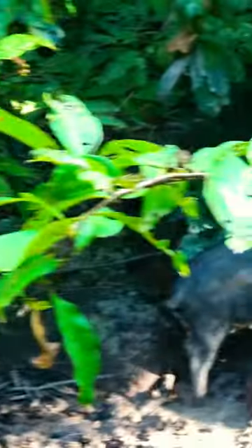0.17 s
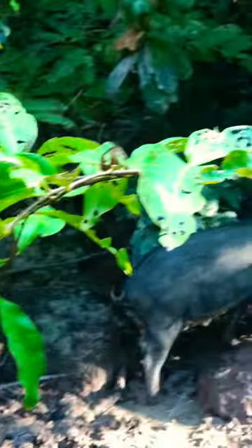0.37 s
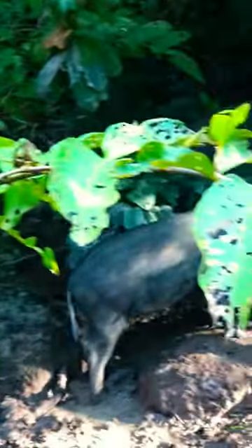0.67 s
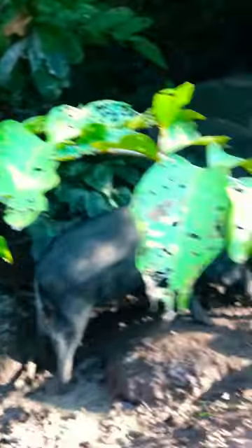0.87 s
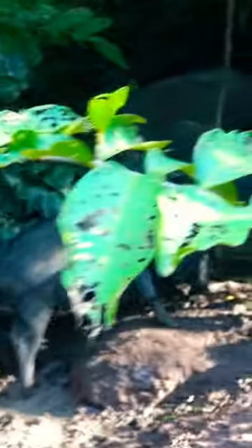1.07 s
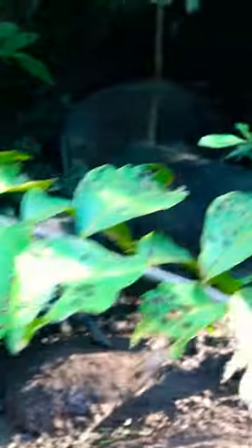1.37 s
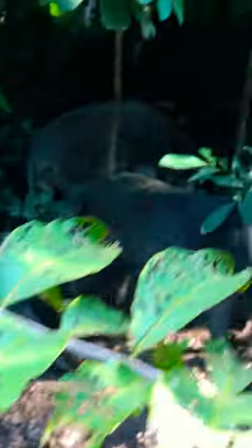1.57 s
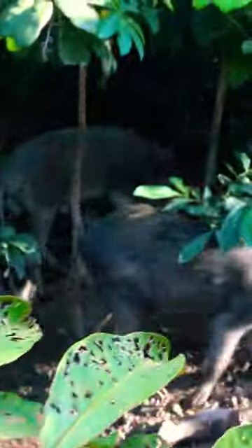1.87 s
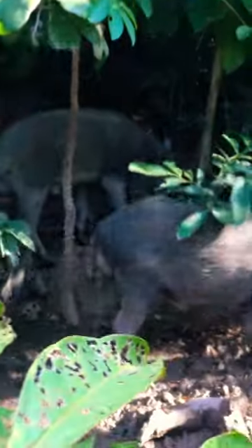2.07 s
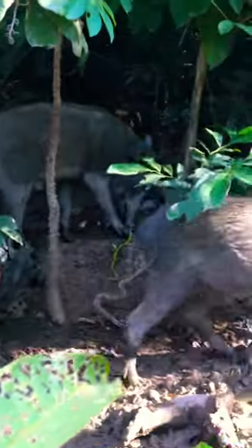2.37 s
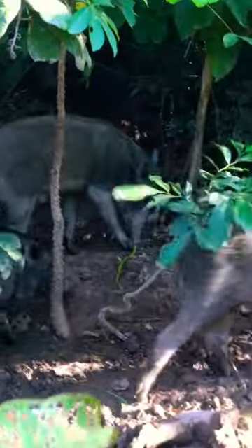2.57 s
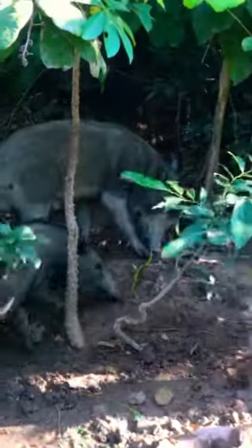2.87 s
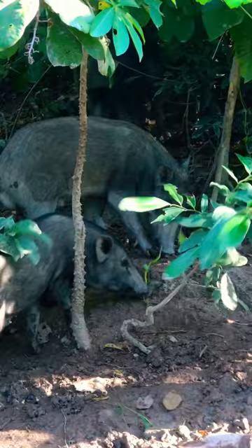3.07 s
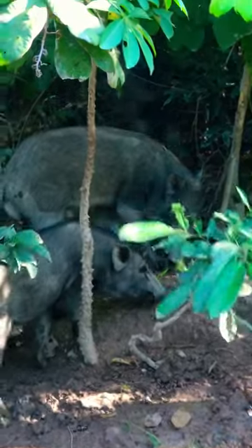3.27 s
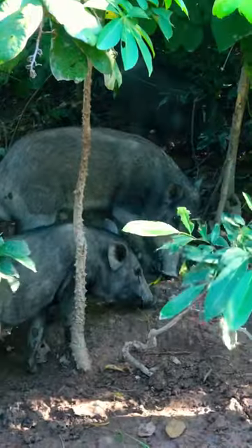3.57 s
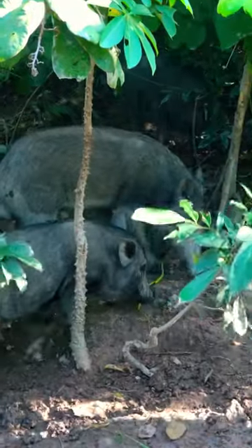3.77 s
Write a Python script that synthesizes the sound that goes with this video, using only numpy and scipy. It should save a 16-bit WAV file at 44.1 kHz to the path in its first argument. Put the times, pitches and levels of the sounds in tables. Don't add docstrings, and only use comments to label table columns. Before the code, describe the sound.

Rustling, crackling litter as boars forage, with snapping twigs over a faint low engine drone

```python
import sys
import numpy as np
from scipy import signal
from scipy.io import wavfile

SR = 44100
rng = np.random.default_rng(int(sys.argv[2]) if len(sys.argv) > 2 else 0)


def boost_factor(decibels):
    exponent = np.asarray(decibels, float) / 20
    return 10 ** exponent


def persist_wave(psi):
    counts = np.round(np.clip(psi, -1, 1) * 32767).astype(np.int16)
    wavfile.write(sys.argv[1], SR, np.atleast_2d(counts).T)


N = 173313


def in_time(rows):
    s, *columns = np.transpose(rows)
    return [np.interp(np.arange(N) / SR, s, c) for c in columns]


def rms_one(x):
    return x / np.sqrt(np.mean(x ** 2) + 1e-20)


def drift(rate_hz):
    pole = np.exp(-80 * np.pi * rate_hz / SR)
    noise = rng.standard_normal(N // 40 + 2002)
    slow = signal.lfilter([1], [1, -2 * pole, pole * pole], noise)[2000:]
    return np.interp(np.arange(N) / 40, np.arange(len(slow)), rms_one(slow - slow.mean()))


def band_pass(low_hz, high_hz, x):
    return signal.sosfilt(signal.butter(2, [low_hz, high_hz], "band", fs=SR, output="sos"), x)


def grains(spectrum, per_s, spread_db, hiss, patchy_db, clump_db):
    points_hz, points_db = np.transpose(spectrum)
    octaves = np.log2(points_hz[-1] / points_hz[0])
    edges_hz = points_hz[0] * 2 ** np.arange(0, octaves + .3, 1 / 3)
    clump = drift(16) + .6 * drift(50)
    sizes = boost_factor(spread_db * np.minimum(rng.exponential(1, N), 3.2)) * rng.choice([-1, 1], N)
    clicks = rms_one(sizes * (rng.random(N) < per_s * boost_factor(clump_db * clump) / SR))
    place = rng.uniform(0, len(edges_hz), N)
    white = rng.standard_normal((2, N))
    out = 0
    for k, (low, high) in enumerate(zip(edges_hz, np.minimum(edges_hz[1:], 19000))):
        reach = np.exp(-.5 * ((place - k) / 2.25) ** 2)
        band = band_pass(low, high, rms_one(clicks * reach) + hiss * white[k % 2])
        db = np.interp(np.log(low * high) / 2, np.log(points_hz), points_db)
        out = out + band * boost_factor(db + patchy_db * (drift(16.6) + 0.45 * clump))
    return rms_one(out)


def blows(rows, cycles, crack_db):
    size, crunch_t60_s, contact_cycles = 8000, .07, 1
    out, t = np.zeros(N + size), np.arange(size) / SR
    for s, db, hz, crunch_db in rows:
        draw, noise = rng.uniform(0, 1, 2), rng.standard_normal(size)
        crack = signal.lfilter(*signal.butter(1, min(hz * 4.3, 15000), fs=SR), noise)
        hit = boost_factor(crack_db) * crack * np.exp(-t / 0.0018)
        modes = [(1, 1), (0.784 + 0.044 * draw[0], .5), (1.053 + 0.48 * draw[1], .4)]
        for ratio, share in modes:
            ring = np.sin(2 * np.pi * min(hz * ratio, 15000) * t)
            hit = hit + share * ring * boost_factor(-60 * t * hz / cycles)
        rough = noise * np.minimum(noise[::-1] ** 2, 4.)
        crunch = rms_one(band_pass(hz * 0.56, min(hz * 1.94, 15500), rough))
        hit = .8 * hit + boost_factor(crunch_db - 5 - 60 * t / crunch_t60_s) * crunch
        onset = 1 - np.exp(-(t * hz / contact_cycles) ** 2)
        start = int(s * SR)
        out[start:start + size] += boost_factor(db) * hit * onset
    return out[:N]


def rooting():
    # start_s, level_db
    effort = [
        (0.0, -67.5),
        (0.43, -66),
        (1.2, -63),
        (1.64, -57),
        (2.52, -60),
        (2.8, -58),
        (2.93, -64),
        (3.44, -63.5),
        (3.6, -68.5),
        (3.93, -64.5),
    ]
    # freq_hz, level_db per Hz
    soil_spectrum = [(600, -11), (1300, 0.5), (2500, -0.5), (4000, -1), (7000, -4.5), (16000, -23)]
    # freq_hz, level_db per Hz
    tread_spectrum = [(90, -3.5), (250, -4), (600, -7), (2000, -26)]
    soil_db, = in_time(effort)
    soil = grains(soil_spectrum, per_s=900, spread_db=4.0, hiss=0.95, patchy_db=2.3, clump_db=2.5)
    tread = grains(tread_spectrum, per_s=150, spread_db=0.0, hiss=0.59, patchy_db=2.0, clump_db=5.5)
    return boost_factor(soil_db + 0.24) * soil + boost_factor(.5 * soil_db - 34.5) * tread


def brushing():
    # start_s, level_db
    effort = [(0.0, -58), (0.16, -59), (0.48, -62), (1.05, -60), (1.29, -58.5), (1.61, -61.5),
              (2.44, -54.5), (2.76, -56.5), (2.92, -58.5), (3.28, -62), (3.79, -63), (3.93, -63.5)]
    # freq_hz, level_db per Hz
    leaf_spectrum = [(700, -7), (3000, 0.5), (6000, 1.5), (9000, 4), (13000, 1.5), (17000, -4.5)]
    brush_db, = in_time(effort)
    leaves = grains(leaf_spectrum, per_s=2200, spread_db=1.0, hiss=1.2, patchy_db=1.57, clump_db=4.0)
    return boost_factor(brush_db + 1.0) * leaves


def snaps():
    # start_s, peak_db, pitch_hz, crunch_db (re the snap)
    events = [(0.318, -55, 1720, -1), (0.488, -37, 2300, -11), (0.509, -32, 6700, -32),
              (0.709, -46, 4580, -4), (0.76, -41.5, 2100, -9), (0.965, -50.5, 1520, -0.5),
              (1.028, -48.5, 1140, -2), (1.117, -40.5, 1614, -6), (1.169, -37, 3170, -6),
              (1.391, -41, 3770, -6), (1.428, -37.5, 3000, -10.5), (1.514, -41, 2800, -3),
              (1.651, -46, 1850, -28), (1.772, -27.5, 3720, -33), (1.983, -37.5, 6060, -7),
              (2.045, -38, 2967, -18), (2.219, -40.5, 1206, -2.5), (2.33, -31.5, 2260, -16),
              (2.383, -33, 1180, -31), (2.505, -37.5, 3930, -21), (2.661, -30, 2090, -16),
              (2.883, -34.5, 2640, -15), (2.99, -43, 2160, -20), (3.051, -42, 4205, -16),
              (3.078, -51, 3960, -27), (3.16, -51, 1310, 2.5), (3.21, -63, 2860, -15),
              (3.288, -45.5, 2747, -20), (3.326, -45, 1349, -18), (3.443, -63, 3330, -32)]
    return blows(events, cycles=24., crack_db=-9)


def knocks():
    # start_s, peak_db, pitch_hz
    events = [(0.781, -43, 1380), (1.427, -46.5, 322), (1.427, -47, 940), (1.657, -41, 622),
              (1.7703, -27.5, 8600), (1.834, -46, 550), (1.894, -44.5, 677), (2.244, -33.5, 2600),
              (2.345, -45.5, 222), (2.819, -39, 2200), (2.861, -41, 1240), (2.884, -41, 362)]
    return blows([(s, db, hz, -14) for s, db, hz in events], cycles=22., crack_db=-19)


def scuffs():
    # start_s, length_s, level_db, pitch_hz
    events = [(.06, 0.23, -58.5, 5060), (0.507, 0.047, -55, 6000), (0.714, 0.091, -62, 8500),
              (.72, 0.32, -64.5, 494), (1.33, 0.096, -58.5, 8950), (1.491, 0.043, -63.5, 2500),
              (1.561, 0.1, -59.5, 510), (1.765, 0.069, -53.5, 9350), (1.77, 0.13, -56, 450),
              (1.775, 0.12, -52.5, 2450), (1.987, 0.049, -52, 5576), (2.22, 0.041, -51.5, 7250),
              (2.218, 0.032, -51, 3510), (2.12, 0.027, -58, 3494), (2.448, 0.055, -55, 4500),
              (0.759, 0.024, -55, 11500), (3.78, .15, -66, 691), (3.21, .015, -55, 7000),
              (2.24, 0.38, -58, 1840), (2.267, 0.28, -57.5, 350), (2.622, 0.17, -53.5, 2070),
              (2.633, 0.29, -60.5, 456), (2.836, 0.14, -54, 1780), (2.898, 0.049, -52.5, 8600),
              (3.33, 0.24, -62, 1095), (3.82, 0.11, -62.5, 1890)]
    out = np.zeros(N)
    for s, length_s, db, hz in events:
        n, draw = int(length_s * SR), rng.standard_normal((3, SR // 2))
        bursts = (draw[1] > 1.9) * np.minimum(np.abs(draw[2]), 1.6) * 1.45
        rough = draw[0] * (0.3 + bursts)
        litter = band_pass(max(hz * 0.42, hz - 1600), min(hz * 1.8, hz + 1900), rough)
        swell = np.sin(np.pi * np.linspace(0, 1, n) ** 0.34)
        start = int(s * SR)
        out[start:start + n] += boost_factor(db) * swell * rms_one(litter)[:n]
    return out


def crackle():
    # start_s, peak_db, pitch_hz
    events = [(0.3297, -48, 1587), (0.5103, -47, 2010), (0.5208, -42, 2560), (0.5208, -49, 8000),
              (0.6604, -47, 1250), (0.7263, -49, 4030), (0.7306, -53, 3174), (1.128, -48, 3174),
              (1.2344, -52, 1270), (1.3474, -51, 10000), (1.4289, -49, 1000), (1.5146, -47, 997),
              (1.519, -42, 3174), (1.58, -48, 4000), (1.5904, -50, 2519), (1.7103, -46, 2507),
              (1.8136, -52, 3174), (1.8149, -50, 500), (1.8318, -46, 500), (1.8962, -41.5, 2020),
              (2.071, -45.5, 1259), (2.2249, -50, 7800), (2.2324, -44, 8000), (2.2973, -42, 4030),
              (2.3495, -41, 5039), (2.3683, -42.5, 4010), (2.3836, -39.5, 4000), (2.4114, -45, 1587),
              (2.4195, -43, 2519), (2.4564, -49, 5039), (2.4589, -43, 820), (2.4724, -42.5, 2050),
              (2.4908, -43, 4030), (2.505, -42.5, 4040), (2.5156, -46, 2000), (2.65, -39, 2000),
              (2.7016, -40, 1587), (2.8256, -46, 1990), (2.8346, -44, 1980), (2.8595, -54, 1240),
              (2.9114, -48, 8000), (2.9421, -44.5, 4040), (3.0777, -56, 3915), (3.1623, -47, 4000),
              (3.2124, -59, 6349), (3.327, -49, 4050), (3.8752, -49, 630.5), (3.9081, -47, 1259)]
    size, cycles, min_t60_s, gain_db = 2000, 14., 0.0084, 1.5
    out, t = np.zeros(N + size), np.arange(size) / SR
    for (s, db, hz), (spread, turn) in zip(events, rng.uniform(0, 1, (len(events), 2))):
        lower = np.sin(2 * np.pi * .95 * hz * t)
        upper = np.sin(2 * np.pi * ((1.04 + .1 * spread) * hz * t + turn))
        decay = boost_factor(db + gain_db - 60 * t / max(cycles / hz, min_t60_s))
        onset = 1 - np.exp(-t * hz / 1.1)
        start = int(s * SR)
        out[start:start + size] += decay * (lower + .7 * upper) * onset
    return out[:N]


def ticks():
    # start_s, peak_db, pitch_hz
    events = [(.209, -49, 1210), (.3175, -42, 1620), (1.235, -51, 3200), (1.4065, -46, 1400),
              (1.813, -47, 3200), (2.384, -47, 4100), (3.05, -52, 4110), (3.078, -52, 3900),
              (3.163, -52, 4200), (3.211, -48, 2800), (3.362, -52, 3200), (3.443, -47, 3360),
              (3.455, -48, 3100)]
    size, t60_s, onset_s = 4000, .028, .0005
    out, t = np.zeros(N + size), np.arange(size) / SR
    for s, db, hz in events:
        pair = np.sin(2 * np.pi * hz * t) + .6 * np.sin(2 * np.pi * 1.09 * hz * t)
        start = int(s * SR)
        out[start:start + size] += boost_factor(db - 60 * t / t60_s) * pair * (1 - np.exp(-t / onset_s))
    return out[:N]


def engine():
    # start_s, firing_hz, level_db, second_order_db
    run = [(0.0, 61.9, -47, -84), (0.19, 60.8, -55.5, -80), (0.36, 61.1, -53, -84), (0.46, 62.3, -58, -70),
           (0.52, 61.24, -55, -90), (0.61, 62, -50, -59), (0.79, 61, -52.5, -63), (0.94, 61.45, -52, -75),
           (1.68, 61.28, -53.5, -71), (1.87, 61.2, -49, -61), (2.36, 60.7, -56.5, -69.5),
           (2.54, 61.61, -51, -62), (2.91, 62.46, -56, -70), (2.94, 60.8, -55, -63),
           (3.03, 60.63, -56.5, -80), (3.16, 59.9, -53, -58.5), (3.69, 60.2, -53, -77.5),
           (3.93, 59.3, -48.5, -62)]
    # multiple of firing rate, level_db (re the run)
    fixed_orders = [(1, 0.5), (1.42, -20.5)]
    # start_s, level_db
    hum = [
        (0, -75.5),
        (1.3, -76),
        (2.55, -80),
        (2.68, -66),
        (2.95, -74.5),
        (3.93, -69),
    ]
    hum_hz, hum_wander_rad, jitter_rad = 377, .9, 0.39
    firing_hz, db, second_db = in_time(run)
    phase = 2 * np.pi * np.cumsum(firing_hz) / SR + jitter_rad * drift(7.5)
    hum_phase = 2 * np.pi * hum_hz * np.arange(N) / SR + hum_wander_rad * drift(4)
    pipe = boost_factor(2 * drift(6)) * np.sin(hum_phase)
    out = boost_factor(in_time(hum)[0]) * rms_one(pipe)
    for k, order_db in [*fixed_orders, (2, second_db - db)]:
        out = out + np.sqrt(2) * boost_factor(db + order_db) * np.sin(k * phase)
    return out


def bird():
    # start_s, length_s, start_hz, end_hz, level_db
    whistles = [
        (1.388, .155, 3700, 2220, -65.5),
        (2.05, .11, 2460, 2260, -66),
        (2.72, .07, 2360, 2240, -63),
    ]
    bend, flutter_db, breath_rad = 1.7, 4.5, .7
    out = np.zeros(N)
    flutter = boost_factor(flutter_db * np.clip(drift(35), -3, 1))
    breath = breath_rad * drift(60)
    for s, length_s, from_hz, to_hz, db in whistles:
        n, start = int(length_s * SR), int(s * SR)
        now = slice(start, start + n)
        glide_hz = to_hz + (from_hz - to_hz) * np.linspace(1, 0, n) ** bend
        tone = np.sin(2 * np.pi * np.cumsum(glide_hz) / SR + breath[now])
        out[now] += np.sqrt(2) * boost_factor(db) * np.hanning(n) ** .2 * tone
    return out * flutter


def air():
    # freq_hz, level_db per Hz
    air_spectrum = [(15, -30), (25, -7.5), (70, -2), (167, -16), (375, -21), (476, -59.5), (1500, -27),
                    (1950, -89), (3300, -120)]
    return boost_factor(-58) * grains(air_spectrum, per_s=1200, spread_db=0.0, hiss=20.0, patchy_db=1.2, clump_db=-4.0)


def scene():
    animals = rooting() + brushing() + snaps() + knocks() + scuffs() + crackle() + ticks()
    background = engine() + bird() + air()
    return (animals + background)[None]


def band_limit(x):
    return signal.sosfilt(signal.butter(12, 15730, fs=SR, output="sos"), x)


def record(dry):
    # freq_hz, width_hz, depth (0-1)
    dips = [(4900, 350, .4), (7600, 600, .35), (10450, 900, .45)]
    x = signal.sosfilt(signal.butter(5, 43, "high", fs=SR, output="sos"), dry)
    x = signal.sosfilt(signal.ellip(10, .3, 60, 15750, fs=SR, output="sos"), x)
    for hz, width_hz, depth in dips:
        x = x - depth * signal.lfilter(*signal.iirpeak(hz, hz / width_hz, fs=SR), x)
    return band_limit(x)


dry = scene()
out = record(dry)
persist_wave(out)
```